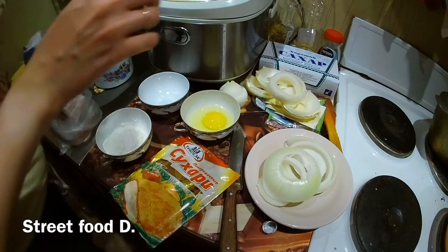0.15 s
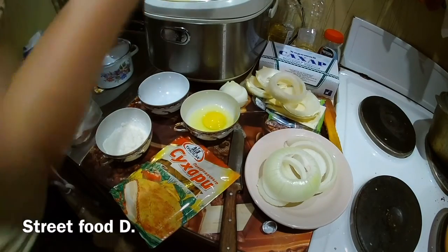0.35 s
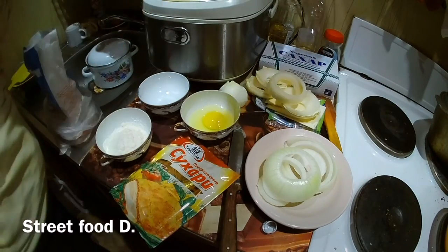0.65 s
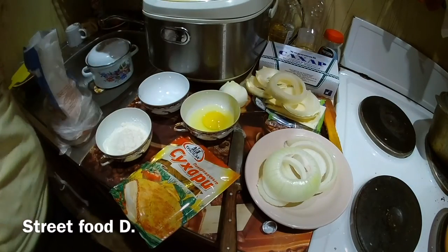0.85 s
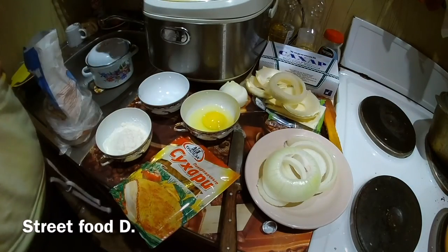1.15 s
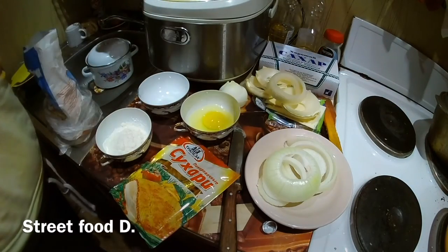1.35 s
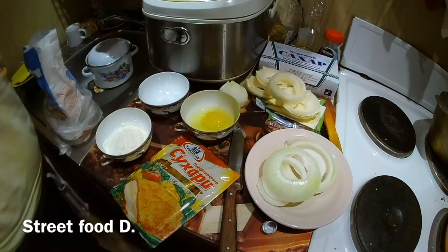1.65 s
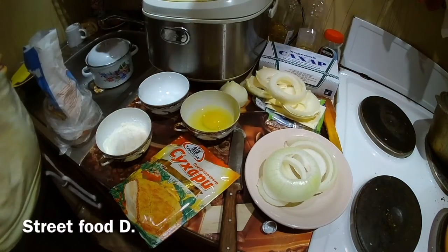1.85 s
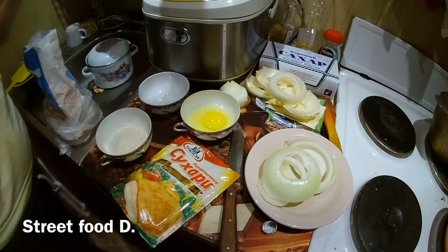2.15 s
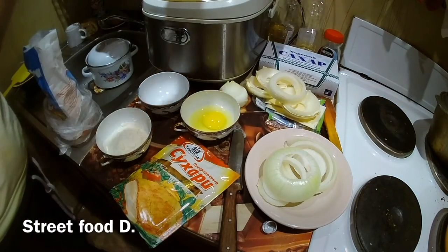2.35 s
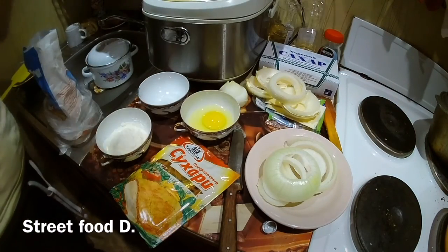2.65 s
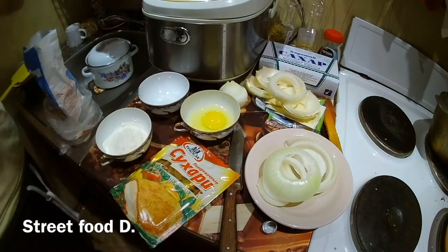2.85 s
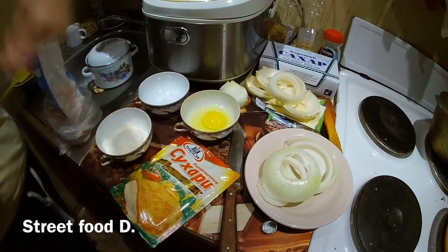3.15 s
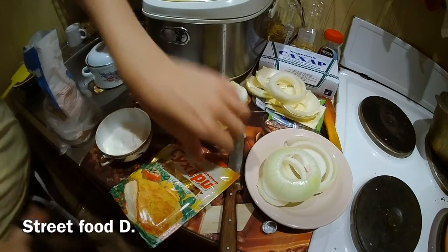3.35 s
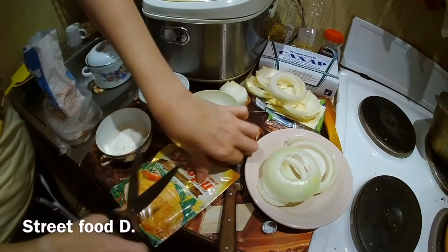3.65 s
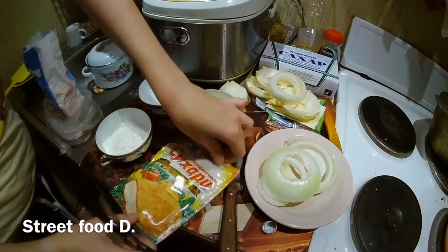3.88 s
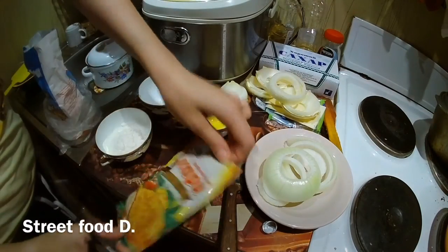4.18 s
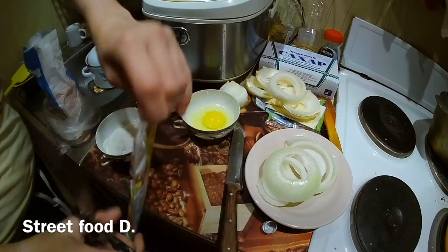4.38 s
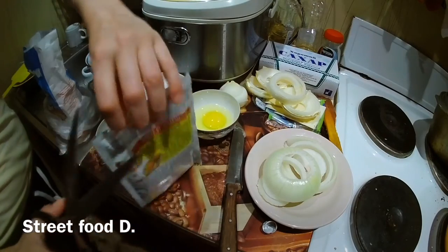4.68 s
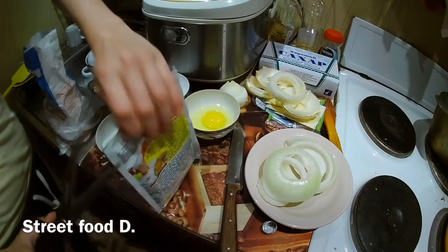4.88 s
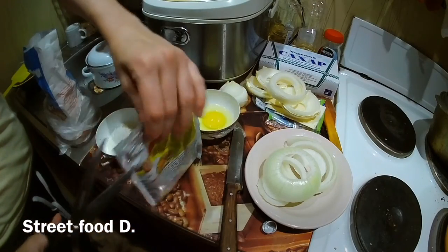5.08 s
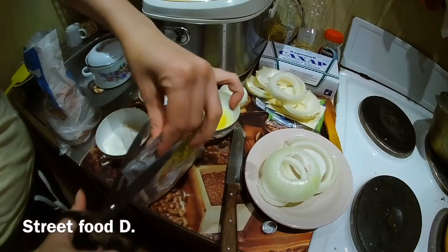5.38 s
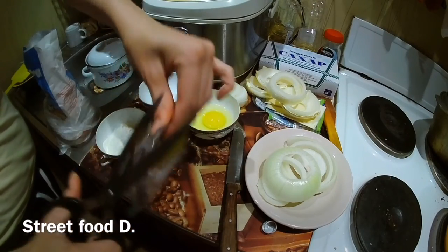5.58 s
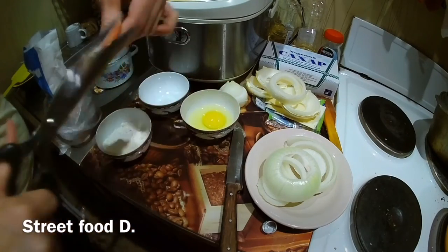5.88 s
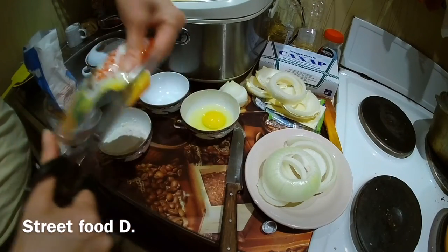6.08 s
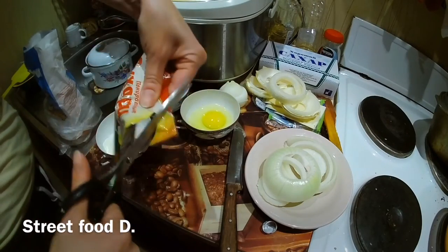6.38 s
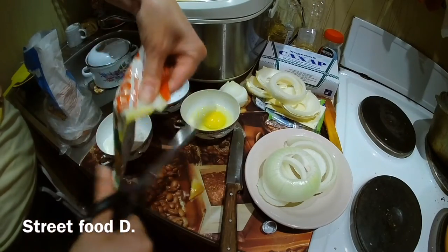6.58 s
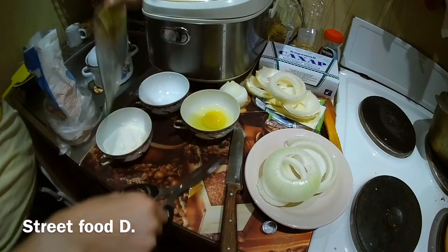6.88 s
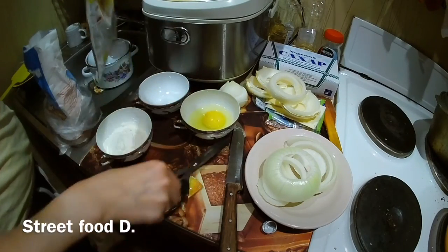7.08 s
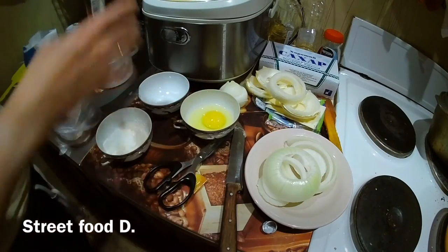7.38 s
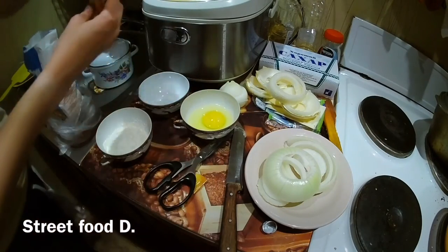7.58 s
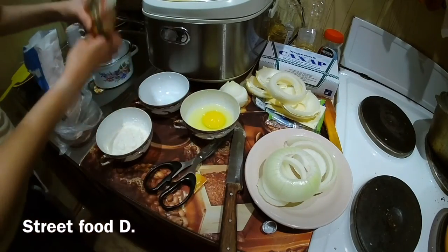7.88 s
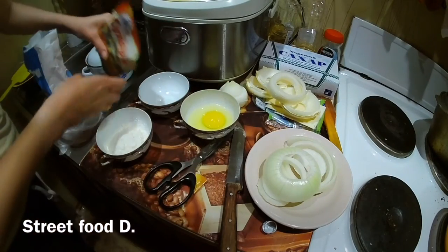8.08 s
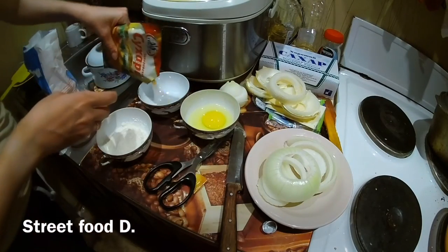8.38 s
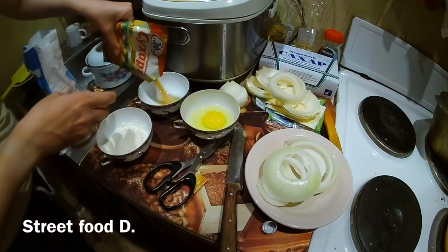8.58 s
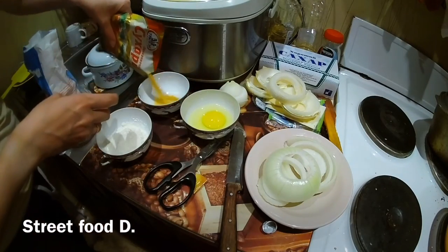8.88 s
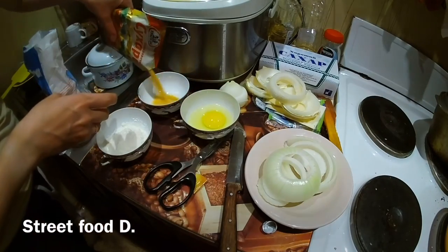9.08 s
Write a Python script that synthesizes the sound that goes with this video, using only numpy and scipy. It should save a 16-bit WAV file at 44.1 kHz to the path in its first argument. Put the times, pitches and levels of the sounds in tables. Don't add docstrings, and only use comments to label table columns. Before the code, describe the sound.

A quiet kitchen hums while a hand rummages through a wooden cutlery drawer, slightly far off, with steel knocks, scrapes and brief rings, then a firm shut. Close to the microphone, a foil packet crumples and snaps and is cut with scissors. The scissors clatter onto the table twice, the second time hard and sharp. The foil rustles again and dry crumbs pour in a fine, dense hiss. Small hard room.

```python
import sys
import numpy as np
from scipy import signal
from scipy.fft import rfft, irfft
from scipy.io import wavfile
from scipy.ndimage import uniform_filter1d, map_coordinates

SR = 44100
rng = np.random.default_rng(int(sys.argv[2]) if len(sys.argv) > 2 else 0)


def rack_gain(trim_db):
    fader = np.asarray(trim_db, float)
    return 10 ** (fader / 20)


def transcribe(u):
    v = np.clip(np.atleast_2d(u).T, -1, 1)
    q = np.round(v * 32767).astype(np.int16)
    wavfile.write(sys.argv[1], SR, q)


N = 407043

# f/Hz, level/dB (per Hz)
HARD_CRACK = [(590, -3), (1000, -9), (1670, -5.5), (2900, -2.5), (3990, 3.5), (4810, -6), (7000, -14.5),
              (15400, -100)]
# f/Hz, level/dB (per Hz)
BRIGHT_TOP = [(3240, -26), (5500, -1), (6420, -6), (7090, 0), (11900, -14), (15200, -19), (16200, -24.5)]


def unit(x):
    return x / np.sqrt(np.mean(x ** 2) + 1e-20)


def along(points, hz):
    f, v = np.transpose(points)
    return np.interp(np.log(hz + 1), np.log(f + 1), v)


def curves(rows):
    s, *cols = np.transpose(rows)
    return [np.interp(np.arange(N) / SR, s, c, left=-120, right=-120) for c in cols]


def colour(points):
    hz = np.fft.rfftfreq(4096, 1 / SR)
    cepstrum = irfft(np.log(rack_gain(along(points, hz)) + 1e-5))
    cepstrum[1:2048] *= 2
    cepstrum[2049:] = 0
    response = irfft(np.exp(rfft(cepstrum)))[:2048]
    return response / np.linalg.norm(response)


def body(modes, swell_s=0.0001):
    t = np.arange(SR // 4) / SR
    response = np.zeros(len(t))
    for k, (hz, width, db) in enumerate(modes):
        ring = np.exp(-np.pi * width * t) * np.sin(2 * np.pi * hz * t)
        response += (-1) ** k * rack_gain(db) * ring
    response *= 1 - np.exp(-t / swell_s)
    return response / np.linalg.norm(response)


def through(x, response):
    return signal.oaconvolve(x, response)[:N]


def bursts(times, db, length, blow=0):
    length = np.clip(length * np.ones(len(times)), .002, .3)[:, None]
    t = np.arange(SR // 6 if length.max() > .05 else SR // 20) / SR
    shape = (1 - np.exp(-(t + 1 / SR) / (2.94 * length ** 2))) * rack_gain(-60 * t / length)
    rows = rng.standard_normal((len(times), len(t))) * shape
    rough_db = 4.5 * rng.standard_normal((len(times), len(t) // 70 + 1))
    rows *= rack_gain(np.repeat(rough_db, 70, axis=1)[:, :len(t)])
    rows[:, 0] += blow * np.linalg.norm(rows, axis=1) * np.exp(-(length[:, 0] / 0.061) ** 2)
    energy = np.linalg.norm(shape, axis=1) / np.linalg.norm(rows, axis=1)
    rows *= (rack_gain(np.asarray(db)) * energy)[:, None]
    where = np.round(np.asarray(times) * SR).astype(int)[:, None] + np.arange(len(t))
    return np.bincount(where.ravel(), rows.ravel(), N + SR)[:N]


def grains(per_s, spread_db, clump_db):
    size = rack_gain(spread_db * rng.exponential(size=N))
    clicks = (rng.random(N) < per_s / SR) * rng.standard_normal(N) * size
    clump_hz = 60
    steps = rng.standard_normal(int(N * clump_hz / SR) + 4)
    clumps = map_coordinates(steps, [np.arange(N) * clump_hz / SR])
    return unit(clicks * rack_gain(clump_db * clumps))


def contacts(rows, low, middle, length, low_db, mid_db, top_db):
    s, db, low_rel, top_rel = np.transpose(rows)[:4]
    knock = through(bursts(s, db + low_rel + low_db, length, blow=1.8), low)
    crack = through(bursts(s, db + mid_db, length, blow=.8), colour(middle))
    top = through(bursts(s, db + top_rel + top_db, length + 0.0027), colour(BRIGHT_TOP))
    return knock + crack + top


def with_top(rows, top_db, bite=0):
    s, db, low_rel = np.transpose(rows)[:3]
    return np.c_[s, db, low_rel, top_db + bite * (db - db.mean())]


def ring_steel(out, s, modes, db):
    t = np.arange(SR // 7) / SR
    for hz, level, t60 in modes:
        drift = np.cumsum(rng.normal(0, 0.064, len(t)))
        decay = rack_gain(db + level + rng.normal(0, 0.98) - 60 * t / t60)
        tone = decay * np.sin(2 * np.pi * hz * t + drift)
        out[round(s * SR):][:len(t)] += tone * (1 - np.exp(-t / 0.00071))


def short_notes(rows, note_db, cycles, blur):
    s, db, hz = np.transpose(rows)[:, :, None]
    t = np.arange(SR // 25) / SR
    waver = np.cumsum(blur * rng.standard_normal((len(rows), len(t))), axis=1)
    tones = rack_gain(db + note_db - 60 * t * hz / cycles) * np.sin(2 * np.pi * hz * t + waver)
    where = np.round((s + 0.001195) * SR).astype(int) + np.arange(len(t))
    return np.bincount(where.ravel(), tones.ravel(), N)[:N]


def room_tone():
    # t/s, level/dB
    ride = [
        (0, -74.5),
        (3.7, -74),
        (7.14, -74.5),
        (7.27, -90),
        (7.6, -82.5),
        (8.4, -75.5),
        (9.23, -77),
    ]
    # f/Hz, level/dB (per Hz)
    hush_colour = [(180, -26.5), (300, 1.5), (600, 10), (1790, 1.5), (4490, -0.5), (5040, -8.5),
                   (5570, 0.5), (16200, -7)]
    # f/Hz, level/dB (per Hz)
    hum_colour = [(12, -38), (20, 0.5), (48, -8.5), (198, -9), (275, -3), (400, -3.5), (520, -29),
                  (880, -120)]
    hush = rack_gain(16.5) * through(rng.standard_normal(N), colour(hush_colour))
    hum = rack_gain(6.0) * through(rng.standard_normal(N), colour(hum_colour))
    return rack_gain(curves(ride)[0]) * (hush + hum)


def drawer():
    # t/s, slide level/dB, rumble level/dB
    sliding = [
        (0.0, -72, -74),
        (1.35, -36, -43),
        (1.63, -96, -61),
        (2.75, -75, -50),
        (2.84, -31, -65),
        (3.36, -53, -55.5),
        (3.7, -33, -56),
    ]
    # t/s, peak level/dB, wood rel.
    # level/dB, top rel. level/dB
    drawer_knocks = [(0.224, -46, -17, -16), (0.236, -36, 8, -10), (0.351, -45, 11.5, -12),
                     (0.3776, -51, 17.5, -18), (0.4648, -56.5, 13, -20), (0.843, -30, -25, -8),
                     (0.907, -30, -23, -7), (1.054, -38.5, -34, -8), (1.087, -25, -36, -8.5),
                     (1.2136, -32, -8.5, -14), (1.294, -27, -19, -20), (1.336, -26, -9.5, -16),
                     (1.357, -25.5, -14, -31), (1.559, -34, -15, -26), (1.669, -40, -42, 1), (1.697, -43, -46, 1),
                     (1.8568, -29, -1, -11), (2.065, -34.5, -11, -12), (2.131, -30, -21, -10.5),
                (2.193, -27.5, -24, -10.5), (2.2108, -27.5, -20, -2.5), (2.236, -30, -19, -29),
                (2.315, -46.5, 6.5, -13), (2.3855, -20, -17.5, -11), (2.465, -29, -8, -6),
                (2.6514, -18.5, 2, -31), (2.777, -24.5, -17, -5.5), (2.8012, -40, 9.5, -17),
                (2.873, -31, 11.5, -13), (2.9184, -11.5, -7, -2.5), (3.0985, -27.5, 5.5, -12.5),
                (3.197, -51, 13.5, 0), (3.308, -34, -34, -7), (3.357, -28, -11, -7.5),
                (3.499, -39, -26, -6), (3.5116, -27, -30, -18), (3.621, -49.5, 9, -25), (3.66, -50, 9, -24)]
    # t/s, peak level/dB, wood rel. level/dB, length/s
    scrapes = [(0.598, -21, -39, 0.11), (0.613, -42.5, 0, 0.18), (0.6421, -30.5, -10, 0.11),
               (0.6457, -22.5, -25, 0.074), (0.6817, -26.5, -13.5, 0.056), (0.775, -32, -12.5, 0.1),
               (0.835, -24.5, -18, 0.077), (0.922, -31, -7.5, 0.067), (1.308, -41, -1, 0.082),
               (1.366, -30, -25, 0.36), (1.441, -33.5, -6, 0.14), (1.487, -34, -36, 0.027),
               (1.565, -35.5, -6.5, 0.056), (1.8807, -22, -13.5, 0.059), (1.887, -24, -11, 0.019),
               (2.86, -46, -17, 0.15), (3.533, -28, -19, 0.12)]
    # t/s, f/Hz, level/dB, t60/s
    pings = [(0.246, 4600, -39.5, 0.087), (0.607, 5400, -34, 0.14), (0.63, 5360, -35, 0.1),
             (3.101, 4300, -29, 0.02), (0.852, 3200, -32, 0.034), (1.212, 6700, -27, 0.031),
             (1.215, 4740, -38, .07), (0.876, 1790, -41, 0.04), (2.3, 5400, -49, 0.054),
             (2.47, 7200, -45, .1), (2.651, 8500, -34.5, 0.094), (2.652, 10400, -58, 0.099),
             (2.652, 11000, -53, 0.13), (2.781, 7500, -45, 0.062), (2.922, 7170, -27, 0.15),
             (3.0, 3230, -41.5, 0.1), (3.308, 8400, -44, 0.055), (3.5, 3420, -33.5, 0.042)]
    # t/s, peak level/dB, f/Hz
    ticks = [(0.6058, -30, 4140), (0.6118, -22, 5400), (0.7849, -35, 2100), (0.8442, -32, 3240),
             (0.9076, -28, 3450), (1.0508, -30, 3780), (1.0867, -18.5, 4420), (1.2154, -22, 4800),
             (1.2947, -26, 4200), (1.3346, -30, 4170), (1.4928, -33, 3540), (1.5526, -44, 4010),
             (1.5716, -31, 3850), (1.6694, -25.5, 4400), (1.6973, -28, 3830), (1.8529, -28, 1100),
             (1.8629, -19.5, 3330), (2.065, -35, 3380), (2.1283, -23, 4020), (2.1972, -21, 3850),
             (2.2131, -18, 4370), (2.3857, -23.5, 4260), (2.468, -20.5, 4440)]
    # f/Hz, width/Hz, level/dB
    wood_modes = [(600, 70, -2.5), (710, 220, 4), (751, 130, 5), (862.3, 70, 10), (888, 260, 24),
                  (920, 60, 10.5), (1090, 470, 3), (1374, 240, 6.5), (1674, 405, 11.5)]
    # f/Hz, width/Hz, level/dB
    tray_modes = [(1450, 460, 4), (1670, 230, 2.5), (1950, 360, -24), (2134, 27, -6.5), (2480, 210, 3),
                  (2360, 430, 14), (2424, 88, 4.5), (2750, 450, 0), (3260, 1000, 7)]

    knocks = np.array(drawer_knocks)
    s, db, wood_rel = knocks.T[:3]
    rows = np.r_[knocks, with_top(scrapes, top_db=-15.5, bite=0.86)]
    knock_s = np.where(wood_rel > 0, 0.012, 0.035)
    length = np.r_[knock_s, np.transpose(scrapes)[3]]
    out = contacts(rows, body(wood_modes, swell_s=0.0019), HARD_CRACK, length,
                   low_db=10.0, mid_db=0.0, top_db=5.5)

    tray_db = db + wood_rel - 6.5 + 0.99 * np.minimum(wood_rel, 0) + 0.23 * (db + 30.5)
    out += through(bursts(s, tray_db + 10.5, 0.0086, blow=1.0), body(tray_modes))

    for ping_s, hz, ping_db, t60 in pings:
        ring_steel(out, ping_s, [(hz, ping_db, t60)], 0)
    out += short_notes(ticks, note_db=-4, cycles=41, blur=0.095)

    slide_db, rumble_db = curves(sliding)
    rub = grains(per_s=4000, spread_db=2, clump_db=2)
    slide = through(rub, colour(HARD_CRACK)) + rack_gain(-11.0) * through(rub, colour(BRIGHT_TOP))
    rumble = through(rng.standard_normal(N), body(wood_modes))
    return out + rack_gain(slide_db - 20.5) * slide + rack_gain(rumble_db - 8.0) * rumble


def room(x):
    # f/Hz, t60/s
    decay = [(200, 0.3), (1000, 0.23), (4000, 0.2), (12000, 0.16)]
    step, size, count = 1024, 16384, 24
    hz, t, z = signal.stft(rng.standard_normal((count, size - 2 * step)), SR, nperseg=256)
    fading = z * rack_gain(-60 * t / along(decay, hz)[:, None])
    tails = rfft(signal.istft(fading, SR, nperseg=256)[1], size)
    usual = uniform_filter1d(np.abs(tails).mean(0), 99)
    even = usual / uniform_filter1d(np.abs(tails), 30, axis=1)
    tails = tails * even / np.sqrt(np.mean(np.abs(tails) ** 2))
    starts = np.arange(N // step) * step
    moments = np.pad(x, (0, 2 * step))[starts[:, None] + np.arange(2 * step)]
    moments = moments * signal.get_window("hann", 2 * step)
    answers = irfft(rfft(moments, size) * tails[np.arange(len(starts)) % count], size)
    out = np.zeros(N + 2 * size)
    for start, answer in zip(starts + 90, answers):
        out[start:][:size] += answer
    return out[:N]


def cabinet():
    # t/s, peak level/dB
    thumps = [(0.244, -19.5), (0.659, -17.5), (1.892, -16), (3.653, -28), (3.78, -24), (3.809, -29),
              (3.931, -24.5), (6.16, -24), (6.341, -23), (6.93, -18.5), (7.153, -20.5), (7.199, -25),
              (2.433, -3), (2.458, -12), (2.917, -15.5), (4.686, -20)]
    # f/Hz, level/dB (per Hz)
    frame = [(50, -18.5), (130, -10.5), (200, -2.5), (300, 4), (450, -1), (900, -28.5)]
    s, db = np.transpose(thumps)
    return through(bursts(s, db - 15.5, 0.13), colour(frame))


def packet():
    # t/s, level/dB
    rustle = [
        (3.65, -66),
        (4.23, -28),
        (4.38, -31),
        (5.35, -45.5),
        (6.3, -29.5),
        (6.79, -51),
        (7.62, -48.5),
        (8.2, -42.5),
    ]
    # t/s, peak level/dB, belly rel. level/dB
    lift_snaps = [(3.7235, -14, -24), (3.7363, -8.5, -47), (3.778, -10, -19.5), (3.7868, -9.5, -16.5),
                  (3.812, -33, -2), (3.877, -22, -27), (3.8866, -14, -17), (3.935, -23, -0.5),
                  (4.082, -28.5, -10), (4.1964, -18, -29), (4.2412, -22.5, -10), (4.2529, -13.5, -13.5),
                  (4.3328, -6, -13.5), (4.3915, -6.5, -23), (4.4204, -34, -3), (4.668, -27, -9),
                  (4.6878, -6.5, -13.5), (4.7393, -12.5, -17.5), (4.7637, -16, -11.5), (4.8865, -28.5, -6),
                  (4.9233, -27, -1.5), (4.9327, -13.5, -22), (4.9772, -18, -8), (5.0487, -19, -12),
                  (5.0625, -14, -14)]
    # t/s, peak level/dB, belly rel. level/dB, top rel. level/dB
    cut_snaps = [(5.2952, -38, -6.5, -31), (5.43, -32.5, -5, -15), (5.458, -33, -22, -11),
                 (5.4888, -18.5, -16.5, -20), (5.5216, -19.5, -14, -11.5), (5.569, -9.5, -40, -14.5),
                 (5.6967, -19.5, -7, -12), (5.7334, -10.5, -15.5, -32), (5.8207, -21, -14.5, -16),
                 (5.8388, -11.5, -19, -8.5), (5.9521, -22, -8, -10), (5.9592, -14.5, -42, -5.5),
                 (5.978, -17, -16, -4), (6.052, -31, -6.5, -8), (6.0864, -8.5, -17.5, -13),
                 (6.118, -18, -35, 0), (6.13, -8, -19.5, -10), (6.147, -12.5, -34, -0.5),
                 (6.1558, -7, -14.5, -6), (6.1592, -1, -13, -23), (6.2042, -20, -22, -8),
                 (6.2648, -21, -40, -3.5), (6.301, -10, -14, -20), (6.3333, -2, -14.5, -16.5),
                 (6.3549, -11, -5.5, -30), (6.4676, -22, -4, -5.5), (6.5184, -12.5, -14.5, -15),
                 (6.6421, -12.5, -31, -6.5), (6.6995, -17, -13, -14), ]
    # t/s, peak level/dB, belly rel. level/dB
    open_snaps = [(7.4825, -30.5, -13), (7.526, -31.5, -6.5), (7.5719, -21, -29), (7.6378, -16.5, -36),
                  (7.811, -39, -11), (8.008, -33, -22), (7.859, -35, -2), (7.878, -40, -4),
                  (7.9307, -21, -16)]
    # t/s, peak level/dB, belly rel. level/dB, length/s
    scrunches = [(3.7, -26, -8, 0.12), (3.74, -25, -39, 0.11), (3.792, -21, -12, 0.041),
                 (3.933, -12.5, -24, 0.029), (4.207, -11, -31, 0.3), (4.228, -10, -11, 0.14),
                 (4.266, -23, -33, 0.24), (4.342, -5.5, -25, 0.25), (4.381, -10, -12, 0.36),
                 (4.461, -5.5, -19, 0.15), (4.49, -10.5, -12.5, 0.18), (4.659, -11, -22, 0.16),
                 (4.751, -13, -14, 0.092), (4.809, -17, -11, 0.1), (4.933, -17, -28, 0.32),
                 (5.053, -16, -8, 0.07), (5.548, -32, -32, 0.048), (5.73, -24, -17, 0.035),
                 (5.961, -10, -22, 0.051), (6.119, -10.5, -10.5, 0.08), (6.329, -6, -5.5, 0.038),
                 (6.348, -12.5, 7.5, 0.094), (6.408, -24.5, 7, 0.12), (6.637, -29.5, 0, 0.084),
                 (7.478, -19.5, -6.5, 0.45), (7.575, -20, -7, 0.082), (7.849, -8.5, -10.5, 0.28),
                 (7.803, -16.5, -20, 0.3), (7.984, -19.5, -37, 0.15), (8.032, -15, -25, 0.2)]
    # f/Hz, level/dB (per Hz)
    belly_colour = [(150, -77.5), (250, -9), (517, -7.5), (949, -5), (1100, -1.5), (2700, -4), (3510, -9),
                    (5940, -120)]
    # f/Hz, level/dB (per Hz)
    sheet_colour = [(1300, -22.5), (2200, -7.5), (3300, -1), (4150, 5), (4600, -3.5), (5000, -10),
                    (7000, -14), (9500, -71)]

    lifted = with_top(lift_snaps, top_db=-19.5, bite=.4)
    creases = np.r_[lifted, cut_snaps, with_top(open_snaps, top_db=-10)]
    snaps = contacts(creases, colour(belly_colour), sheet_colour, length=0.0083,
                     low_db=8.5, mid_db=-3.5, top_db=1.0)
    handfuls = with_top(scrunches, top_db=-16, bite=-0.19)
    scrunch = contacts(handfuls, colour(belly_colour), sheet_colour, np.transpose(scrunches)[3],
                       low_db=-1.5, mid_db=-5.5, top_db=3.5)
    crackle = grains(per_s=2500, spread_db=1.9, clump_db=4)
    sheet = through(crackle, colour(sheet_colour)) + rack_gain(-8.5) * through(crackle, colour(BRIGHT_TOP))
    belly = rack_gain(-4.5) * through(grains(per_s=1500, spread_db=2, clump_db=2), colour(belly_colour))
    return snaps + scrunch + rack_gain(curves(rustle)[0] - 14.5) * (sheet + belly)


def panels():
    # t/s, peak level/dB, f/Hz
    panel_notes = [(3.725, -12, 4040), (3.737, -14.5, 1850), (3.778, -36, 4000), (3.786, -17, 4000),
                   (3.886, -41, 3470), (3.884, -6.5, 4270), (3.934, -18, 1000), (4.086, -36, 4240),
                   (4.172, -30, 1090), (4.196, -9, 2880), (4.229, -11, 3670), (4.25, -13, 3850),
                   (4.331, -7, 2560), (4.392, -14, 3470), (4.421, -16.5, 1440), (4.472, -27, 3370),
                   (4.667, -22, 3980), (4.688, 0, 3970), (4.737, -25, 3920), (4.764, -14, 4300),
                   (4.817, -23, 4250), (4.886, -20, 3930), (4.933, -30, 1960), (4.931, 0, 3860),
                   (4.977, -24, 4050), (5.047, -26, 4090), (5.062, -5.5, 3070),
                   (5.294, -36, 1390), (5.366, -32, 8430), (5.395, -35, 4100), (5.431, -30, 1670),
                 (5.459, -25, 4000), (5.488, -37, 3310), (5.488, -36, 3910), (5.521, -21, 4500),
                 (5.566, -11, 3960), (5.696, -13.5, 1910), (5.733, -8, 3470), (5.803, -23, 2980),
                 (5.819, -29, 3740), (5.839, -17, 3770), (5.959, -10.5, 2150), (5.959, -23, 3770),
                 (5.978, -19, 4240), (6.087, -1.5, 4270), (6.128, -26, 3800), (6.129, -2, 4270),
                 (6.144, -7, 4020), (6.16, -18, 3920), (6.264, -26, 4310), (6.3, -2, 2950),
                 (6.334, -16, 3700), (6.469, -22, 1600), (6.518, -11, 3650), (6.628, -39, 4080),
                 (6.642, -22, 4000), (6.697, -20, 4080), (6.844, -31.5, 4120), (6.873, -37.5, 3520)]
    return short_notes(panel_notes, note_db=-5, cycles=21, blur=0.07)


def scissors():
    # t/s, peak level/dB, table rel. level/dB, top rel. level/dB, blade ring rel. level/dB
    drops = [
        (6.9300, -24.5, 5, -0.5, -9.5),
        (6.9318, -15, 1.5, -13, -1.5),
        (6.9335, -33, -4.5, -11, -12),
        (6.9400, -18, -6, -12, -8.5),
        (6.9564, -23, 1.5, -8, -4.5),
        (6.9672, -19.5, -11, -17, -6.5),
        (6.988, -28, -5, -12.5, -10.5),
    ]
    clashes = [
        (7.1436, -34, -8.5, -9, -22.5),
        (7.1537, -2.5, -8.5, -1.5, -2.5),
        (7.1556, -7.5, -5.5, -12.5, -8.5),
        (7.1614, -6.5, -14.5, -17, -20),
        (7.1638, -12.5, -10.5, -15.5, -14),
        (7.1712, -19.5, -12.5, -11.5, -13.5),
        (7.179, -18, -12.5, -10.5, -12.5),
        (7.184, -13, -7, -7.5, -10.5),
        (7.1895, -17.5, -13, -8.5, -10.5),
    ]
    slaps = [
        (7.1963, -7, -11.5, -8, -4),
        (7.1997, -2, -24, -14, -8.5),
        (7.2031, -2, -20.5, -24.5, -22),
        (7.212, -20, -1, -11.5, -17),
    ]
    # f/Hz, width/Hz, level/dB
    table_modes = [(660, 29, -2), (757, 26, 0), (920, 210, 0), (1100, 90, -1.5), (1238, 37, -1.5),
                   (1390, 60, -1.5), (1570, 70, -7.5), (1739, 61, -6.5), (2027, 56, -1), (2230, 100, -2.5)]
    # f/Hz, width/Hz, level/dB
    edge_modes = [(756, 80, -8.5), (1270, 280, 5), (1570, 160, -1.5), (1910, 200, 2.5), (2180, 170, -6),
                  (2580, 540, 9.5)]
    # f/Hz, level/dB, t60/s
    shut_blades = [(2470, -6, 0.056), (2917, -5.5, 0.058), (3450, -25.5, .08), (3770, -15, 0.096),
                   (4334, -8, 0.089), (4570, -20, .05), (5430, -2, 0.035), (6780, -25.5, .05),
                   (8506, -12, 0.095), (9600, -14, .06)]
    # f/Hz, level/dB, t60/s
    open_blades = [(2025, -2.5, 0.038), (3790, -8.5, .06), (4010, 0, 0.063), (4090, -8.5, 0.049),
                   (4300, -3.5, .055), (5370, -2, 0.05), (6035, -22, .05), (7040, -12, .038),
                   (7500, -28, .05), (8500, -14, 0.05)]
    # f/Hz, level/dB, t60/s
    loose_blade = [(2250, -5.5, 0.046), (2664, 2.5, 0.044), (3050, -7, 0.046), (3234, -2, .06),
                   (3700, -11, .06), (3960, -7, 0.062), (4300, -2.5, .05), (7140, -16.5, .05),
                   (8600, -23.5, .05)]

    out = contacts(drops, body(table_modes), HARD_CRACK, length=0.019, low_db=10.5, mid_db=2.0, top_db=4.5)
    out += contacts(clashes + slaps, body(edge_modes), HARD_CRACK, length=0.0076,
                    low_db=12.0, mid_db=1.5, top_db=4.5)
    for rows, modes in (drops, shut_blades), (clashes, open_blades), (slaps, loose_blade):
        for s, db, _, _, ring_db in rows:
            ring_steel(out, s, modes, db + ring_db)
    return out


def crumbs():
    # t/s, level/dB
    pour = [
        (8.1, -59),
        (8.25, -43.5),
        (8.41, -38.5),
        (8.6, -40.5),
        (9.23, -40.5),
    ]
    # f/Hz, level/dB (per Hz)
    grain_colour = [(180, -48), (900, -11.5), (3600, 0.5), (4200, 3.5), (4800, -3), (9300, -9),
                    (10200, -17.5), (16200, -22)]
    stream = grains(per_s=11000, spread_db=-2.0, clump_db=0.2)
    return rack_gain(curves(pour)[0]) * through(stream, colour(grain_colour))


def scene():
    far, foil, pops, steel = drawer(), packet(), panels(), scissors()
    sent = rack_gain(0.5) * far + rack_gain(-2.0) * foil + rack_gain(-5) * pops + rack_gain(-6.5) * steel
    struck = far + foil + pops + steel + room(sent)
    low_cut = signal.butter(4, 503, "high", fs=SR, output="sos")
    struck = signal.sosfilt(low_cut, struck)
    return (room_tone() + struck + cabinet() + crumbs())[None]


def top_cut(x):
    return signal.sosfilt(signal.butter(12, 16380, fs=SR, output="sos"), x)


def record(dry):
    squeezed = dry - dry / (1 + np.abs(dry / .78) ** 6) ** (1 / 6)
    no_bass = signal.butter(2, 350, "high", fs=SR, output="sos")
    full = dry - signal.sosfilt(no_bass, squeezed)
    band_limit = signal.ellip(8, .5, 60, 15700, fs=SR, output="sos")
    full = signal.sosfilt(band_limit, full)
    return top_cut(full)


dry = scene()
out = record(dry)
transcribe(out)
```